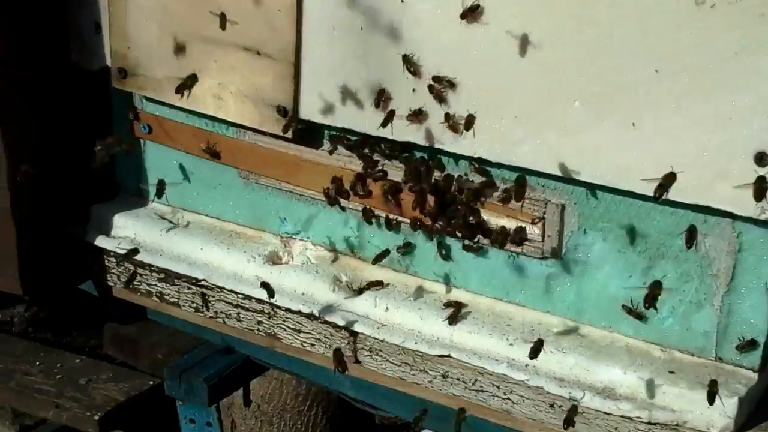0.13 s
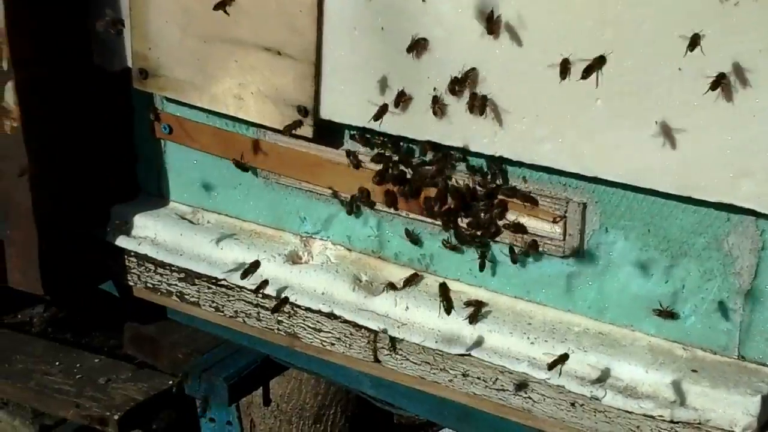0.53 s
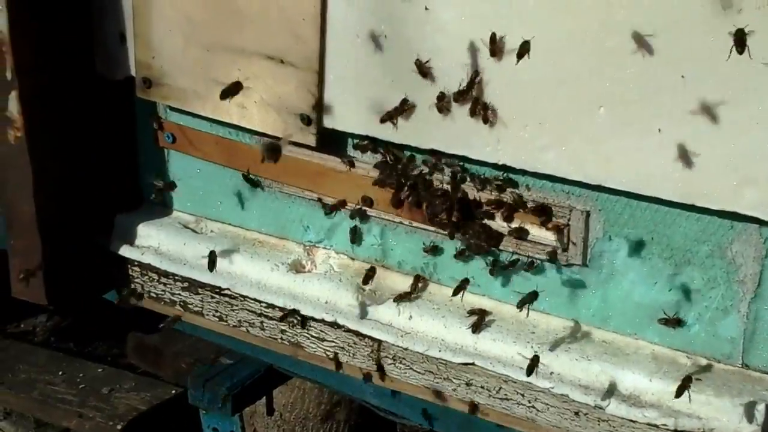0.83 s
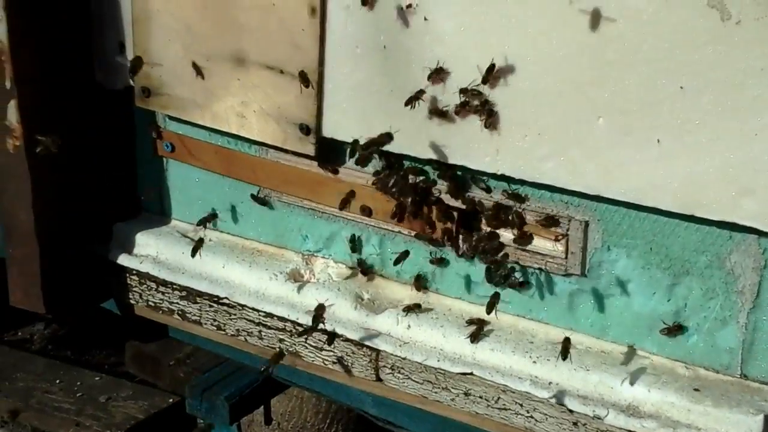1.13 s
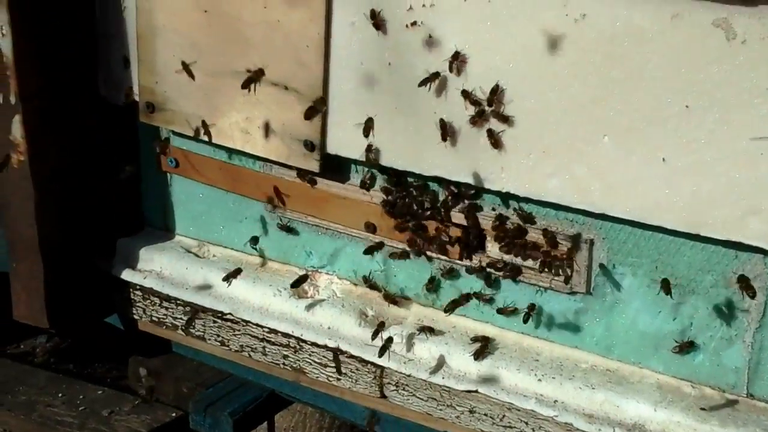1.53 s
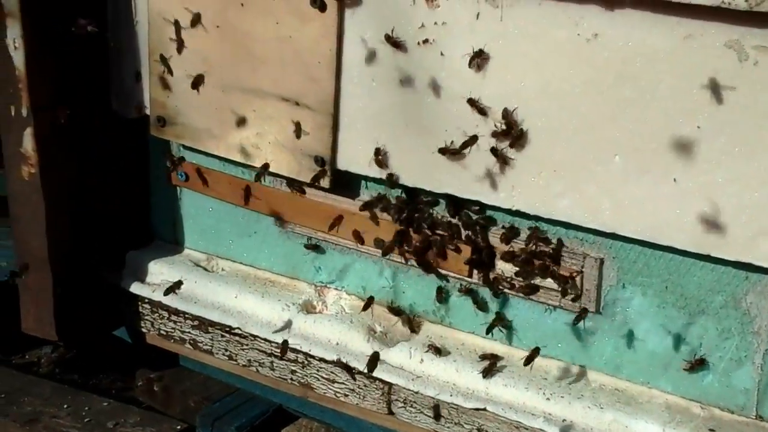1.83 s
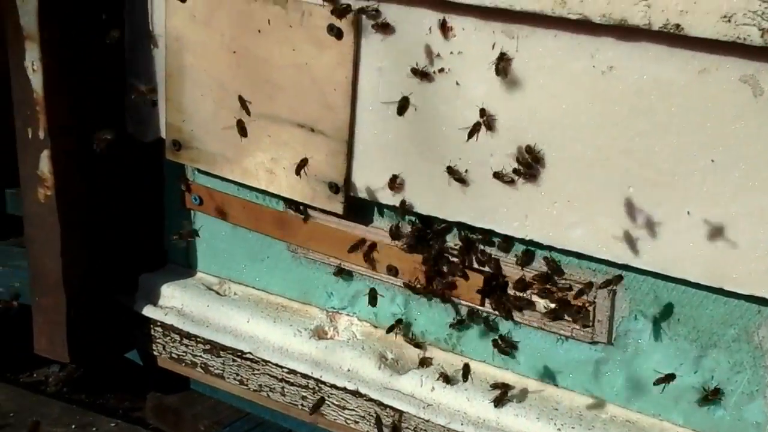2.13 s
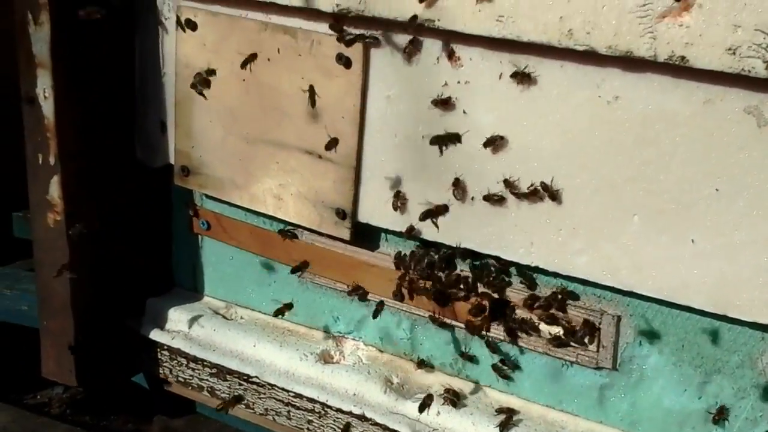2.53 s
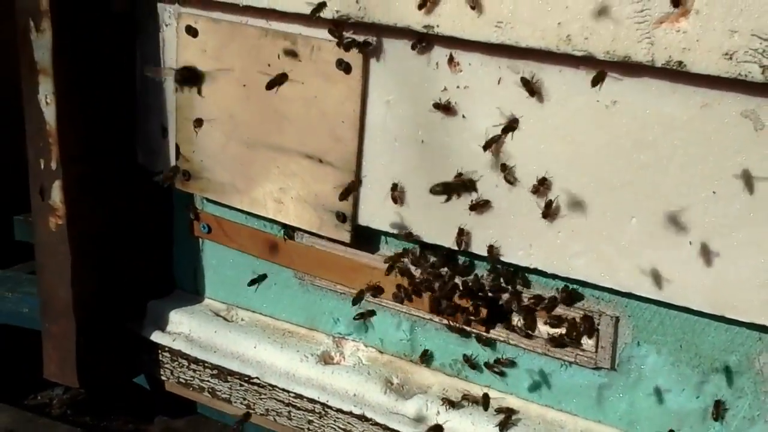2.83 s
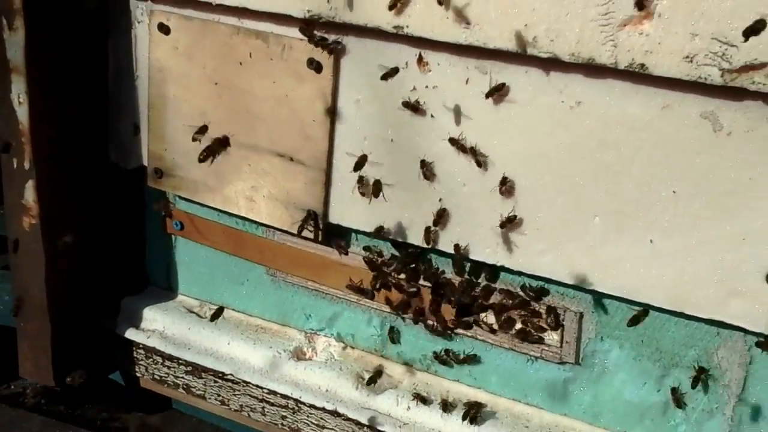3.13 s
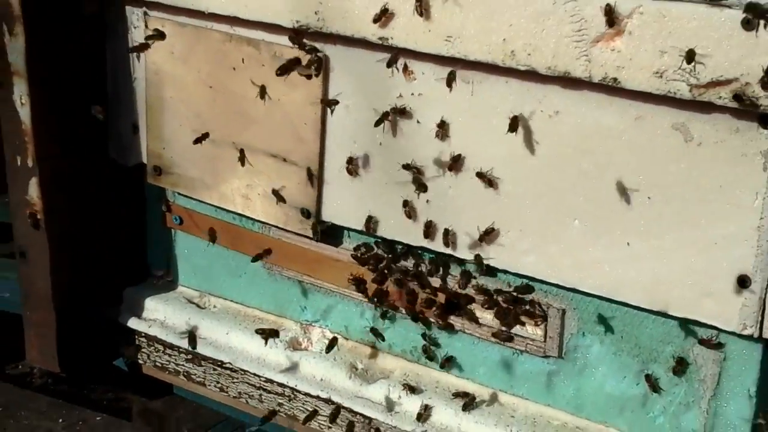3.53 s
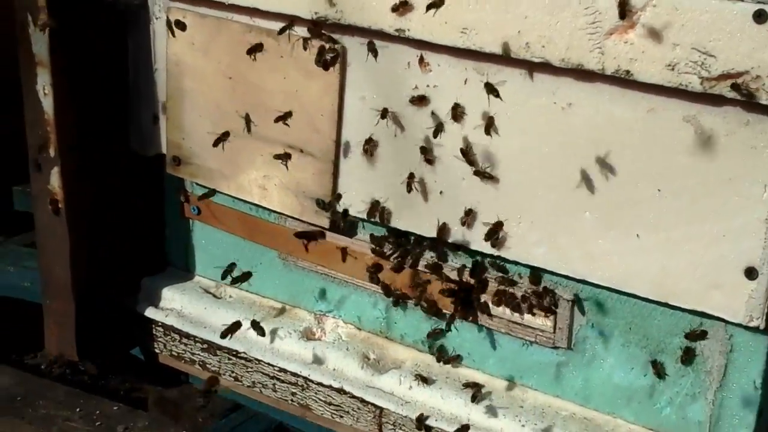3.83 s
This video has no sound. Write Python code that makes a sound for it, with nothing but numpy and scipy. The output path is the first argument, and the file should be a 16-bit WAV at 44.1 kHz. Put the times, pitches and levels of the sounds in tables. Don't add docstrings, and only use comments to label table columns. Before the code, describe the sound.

Dense bee buzzing rises quickly from silence, then continues evenly to the end; overlapping low wing hums waver under a breathy hiss, with close fly-bys, sparse dry ticks and faint open-air rumble, heard centred and close.

```python
import sys
import numpy as np
from scipy import signal
from scipy.fft import rfft, irfft
from scipy.io import wavfile
from scipy.ndimage import uniform_filter1d

SR = 44100
rng = np.random.default_rng(int(sys.argv[2]) if len(sys.argv) > 2 else 0)


def amplitude_ratio(level_db):
    exponent = np.asarray(level_db, float) / 20
    return 10 ** exponent


def wrap_up_sound(samples):
    columns = np.atleast_2d(samples).T
    tamed = np.clip(columns, -1, 1)
    steps = np.round(tamed * 32767).astype(np.int16)
    wavfile.write(sys.argv[1], SR, steps)


N = 176400


def rms_one(x):
    return x / np.sqrt(np.mean(x ** 2) + 1e-20)


def coloured(points):
    hz = np.maximum(np.arange(N // 2 + 1) * SR / N, 1)
    at_hz, db = np.transpose(points)
    gain = amplitude_ratio(np.interp(np.log(hz), np.log(at_hz), db))
    return rms_one(irfft(rfft(rng.standard_normal(N)) * gain, N))


def drift(rate_hz, count):
    r = np.exp(-400 * np.pi * rate_hz / SR)
    noise = rng.standard_normal((count, N // 200 + 402))
    slow = signal.lfilter([1], [1, -2 * r, r * r], noise)[:, 400:]
    slow = slow / slow.std()
    at = np.arange(0, N, 8) / 200
    return np.array([np.interp(at, np.arange(len(row)), row) for row in slow])


def outdoor_floor():
    # pitch_hz, level_db (per Hz)
    rumble = [(20, -16), (60, -6), (110, -0.5), (200, 9.5), (400, 2.5), (1000, -15.5)]
    return amplitude_ratio(-53.5) * coloured(rumble + [(20000, -60)])


def wings(beat_hz, level_db):
    # multiple of the beat rate, level_db
    partials = [(1, -2.5), (2, 0.5), (3, -6.5), (4, -8), (5, -3.5), (6, -6.5), (7, -29.5), (8, -25.5)]
    wander, wander_hz = 0.018, 8.0
    nearness_db, moves_hz, partial_swing_db = 4.5, 5.93, 3.5
    stroke_sharpness = 3.3
    count = len(beat_hz)
    beat = beat_hz[:, None] * (1 + wander * drift(wander_hz, count))
    turn = 2 * np.pi * (np.cumsum(beat, axis=1) * 8 / SR + rng.random((count, 1)))
    near = amplitude_ratio(level_db + nearness_db * drift(moves_hz, count))
    facing = drift(moves_hz * 2, count)
    hum = 0
    for k, (multiple, db) in enumerate(partials):
        tilt = amplitude_ratio(db + partial_swing_db * np.roll(facing, k, axis=0))
        start = rng.uniform(0, 2 * np.pi, (count, 1))
        tone = near * tilt * np.sin((k + 1) * turn + start)
        hum = hum + tone.sum(axis=0)
    puffs = (near ** 2 * np.exp(stroke_sharpness * np.cos(turn))).sum(axis=0)
    hum = signal.resample_poly(hum, 8, 1)[:N]
    puffs = signal.resample_poly(puffs, 8, 1)[:N]
    return hum, np.maximum(puffs, 0)


def swarm():
    # time_s, level_db
    bustle_curve = [(.4, -44), (.65, -46.5), (1.0, -45.5), (1.3, -46.5), (1.7, -45), (2.1, -47),
                    (2.5, -45.5), (2.9, -46.5), (3.3, -46), (3.7, -45.5), (4.0, -47.5)]
    # pitch_hz, level_db (per Hz)
    air_colour = [(700, -5), (1300, -2.5), (2200, -3.5), (3500, -1.5), (5300, 0), (6300, -7), (9500, -18.5),
                  (14500, -23.5)]
    bees, fastest_hz, beat_spread_hz = 48, 275.8, 56
    heavy_bees, heavy_low_hz, heavy_high_hz, heavy_db = 14, 139, 221.8, -9
    hum_db, air_db, air_follows_bustle = 2.5, -41.5, 0.13
    air_steady, air_low_hz = 1, 352

    rank = (np.arange(bees) + rng.random(bees)) / bees
    hum, puffs = wings(fastest_hz - beat_spread_hz * rank, 0)
    heavy_beat_hz = np.linspace(heavy_low_hz, heavy_high_hz, heavy_bees)
    low_hum, low_puffs = wings(heavy_beat_hz, heavy_db)
    hum, puffs = hum + low_hum, puffs + low_puffs
    hum = hum / np.sqrt(uniform_filter1d(hum ** 2, size=13000))
    puffs = puffs / uniform_filter1d(puffs, size=9000)

    at_s, db = np.transpose(bustle_curve)
    bustle = np.interp(np.arange(N) / SR, at_s, db)
    no_rumble = signal.butter(2, air_low_hz, "high", fs=SR, output="sos")
    air = np.sqrt(air_steady + puffs) * signal.sosfilt(no_rumble, coloured(air_colour))
    air_level_db = air_db + air_follows_bustle * (bustle - bustle.mean())
    return amplitude_ratio(bustle + hum_db) * hum + amplitude_ratio(air_level_db) * rms_one(air)


def passes():
    # time_s, beat_hz, first_tone_db, second_tone_db, third_tone_db
    close_bees = [(.45, 249.5, -58, -51, -65), (.57, 254.6, -55, -51.5, -69), (.68, 215, -60, -76, -67),
                  (.76, 236, -53.5, -52, -66), (.97, 257, -94, -50, -68), (1.08, 238, -61, -49, -58),
                  (1.19, 251, -53, -48.5, -57.5), (1.35, 243, -49, -47.5, -57),
                  (1.44, 261, -49, -48.5, -65), (1.63, 250, -52, -47.5, -58), (1.68, 238, -52, -52.5, -53),
                  (1.74, 259, -56, -46.5, -57), (2.0, 250, -61, -48, -55), (2.22, 256, -49, -50.5, -85),
                  (2.39, 249, -58, -48.5, -61), (2.7, 265, -50.5, -52.5, -63), (2.86, 242, -52, -59, -57),
                  (3.01, 252, -56, -48.5, -64), (3.33, 253, -52.5, -51, -65), (3.46, 233, -52.5, -50, -55),
                  (3.62, 270, -54, -50.5, -62)]
    pass_s, wobble = 0.067, 0.00786
    t, out = np.arange(N) / SR, np.zeros(N)
    waver = np.repeat(drift(6.0, len(close_bees)), 8, axis=1)[:, :N]
    for (time_s, beat_hz, *tones_db), w in zip(close_bees, waver):
        turn = 2 * np.pi * np.cumsum(beat_hz * (1 + wobble * w)) / SR
        swell = np.sqrt(2) * np.exp(-0.5 * ((t - time_s) / pass_s) ** 2)
        for k, db in enumerate(tones_db):
            out += swell * amplitude_ratio(db) * np.sin((k + 1) * turn + k)
    return out


def knocks():
    # time_s, peak_db, pitch_hz, ring_s (time to fall by 60 dB)
    taps = [
        (.4725, -28, 4500, .003),
        (0.925, -29, 4400, 0.0025),
        (2.5918, -28, 5230, 0.0023),
        (2.5918, -23.5, 2860, 0.002),
        (3.8743, -30.5, 8300, 0.0057),
        (3.875, -32, 12500, .0012),
    ]
    out = np.zeros(N)
    for time_s, peak_db, pitch_hz, ring_s in taps:
        t = np.maximum(np.arange(N) / SR - time_s, 0)
        onset = 1 - np.exp(-t * 16 / ring_s)
        ring = amplitude_ratio(peak_db - 60 * t / ring_s)
        out += 2 * ring * onset * np.sin(2 * np.pi * pitch_hz * t)
    return out


def scene():
    mono = outdoor_floor() + swarm() + passes() + knocks()
    return np.array([mono, mono])


def top_cut(x):
    return signal.sosfilt(signal.butter(12, 14560, fs=SR, output="sos"), x)


def record(dry):
    offset = -0.00062
    fade_start_s, fade_end_s, fade_curve = 0.37, 0.66, 1.16
    progress = (np.arange(N) / SR - fade_start_s) / (fade_end_s - fade_start_s)
    fade = np.clip(progress, 0, 1) ** fade_curve
    return top_cut((dry + offset) * fade)


dry = scene()
out = record(dry)
wrap_up_sound(out)
```